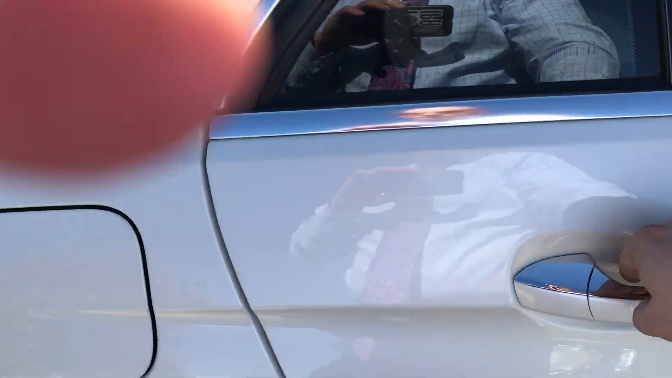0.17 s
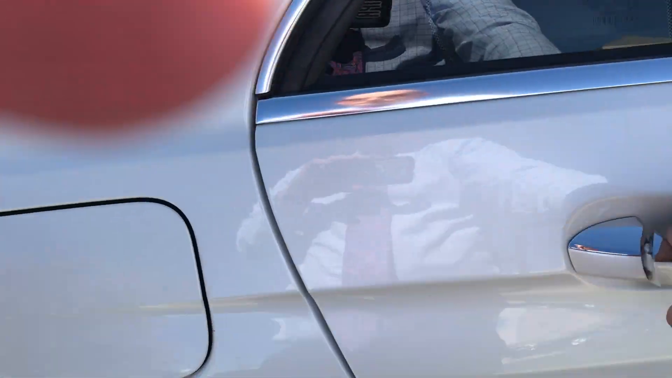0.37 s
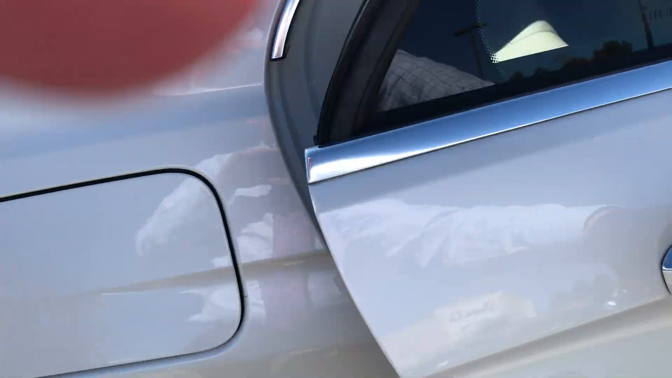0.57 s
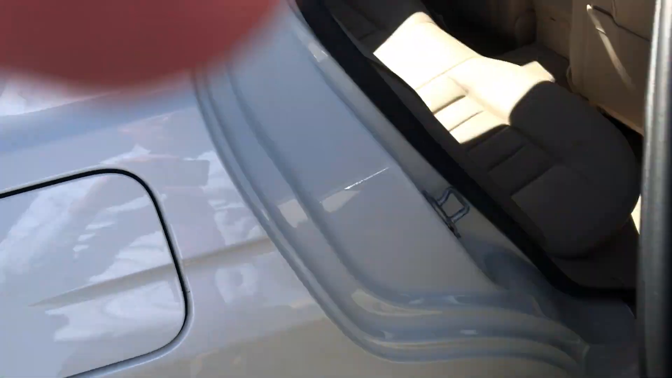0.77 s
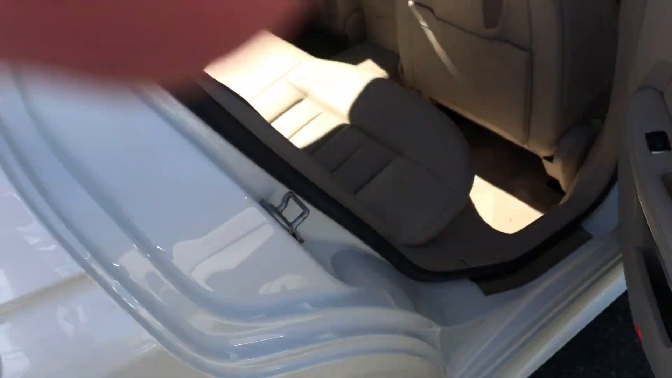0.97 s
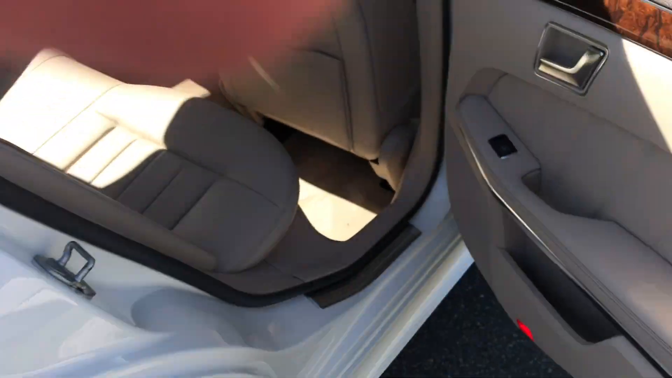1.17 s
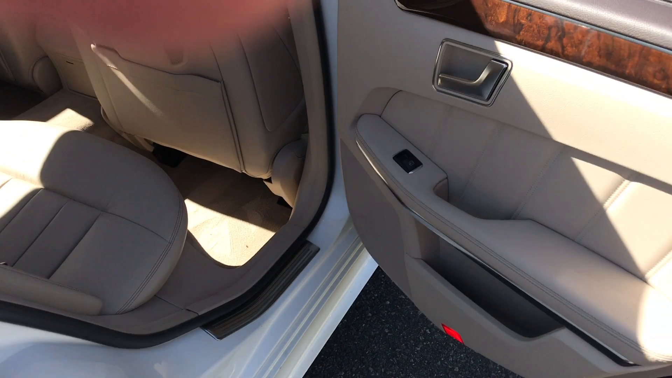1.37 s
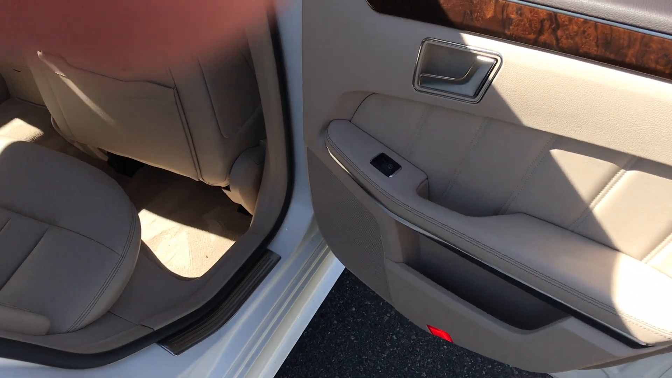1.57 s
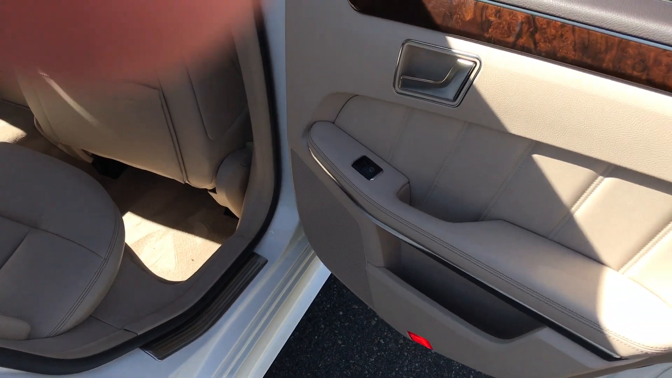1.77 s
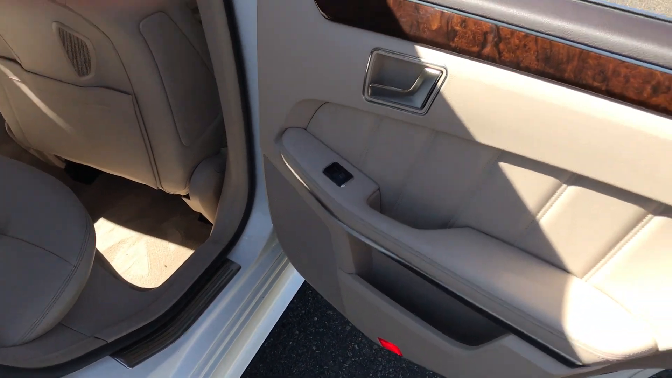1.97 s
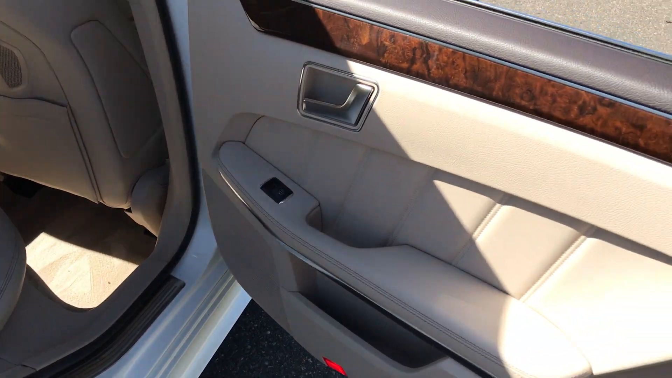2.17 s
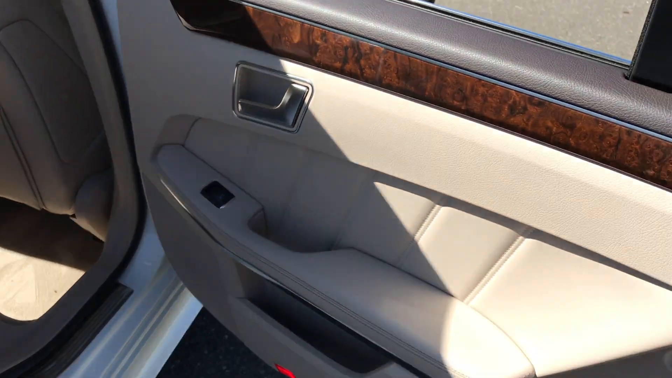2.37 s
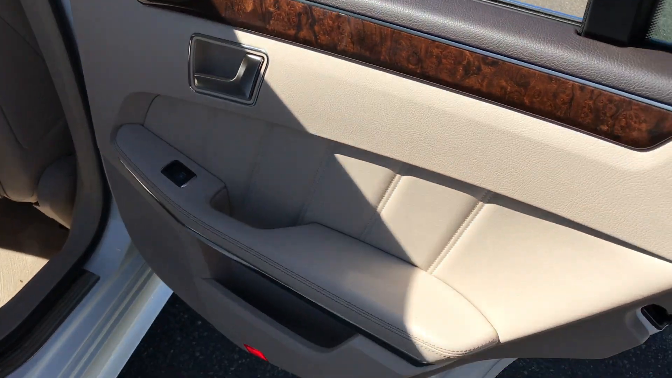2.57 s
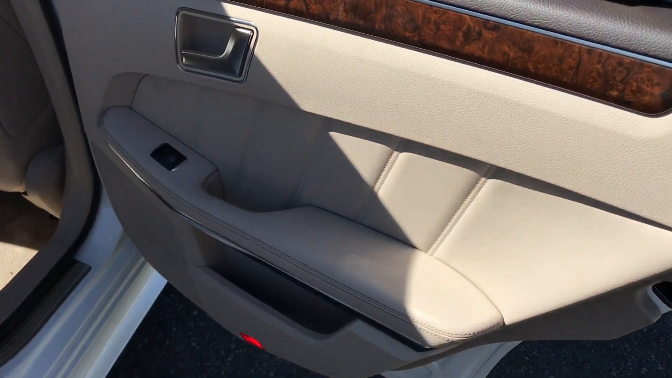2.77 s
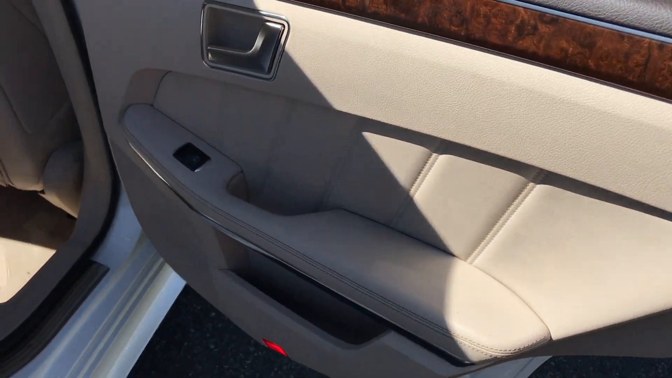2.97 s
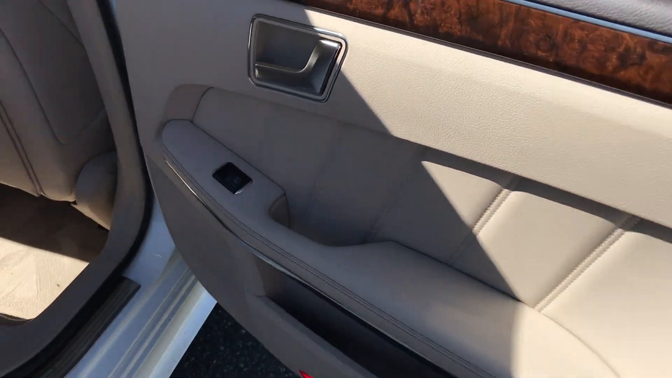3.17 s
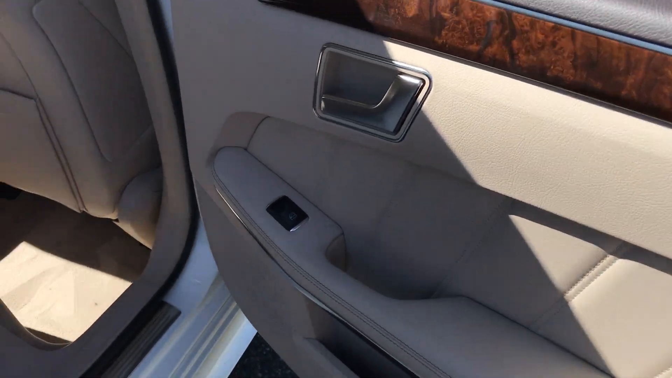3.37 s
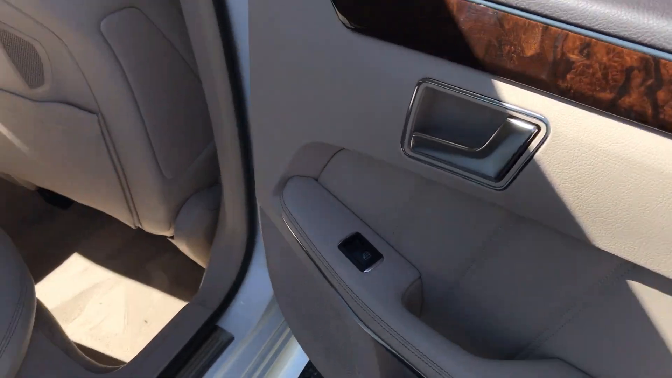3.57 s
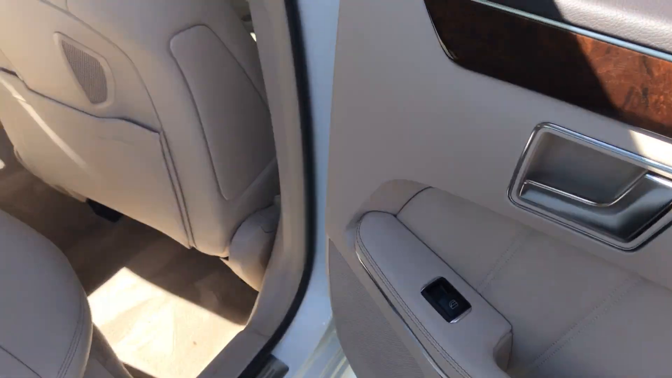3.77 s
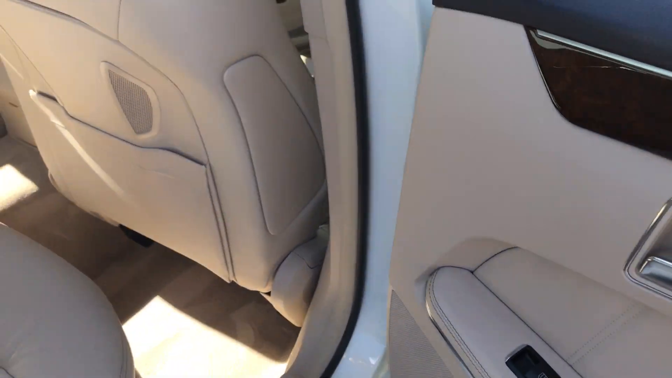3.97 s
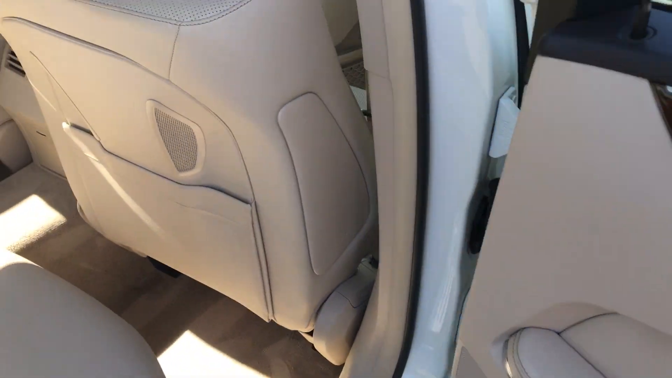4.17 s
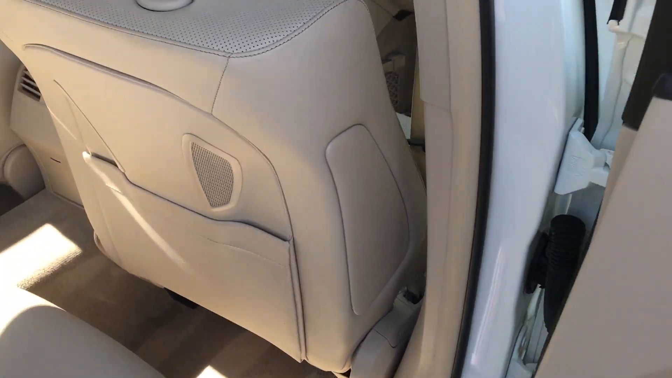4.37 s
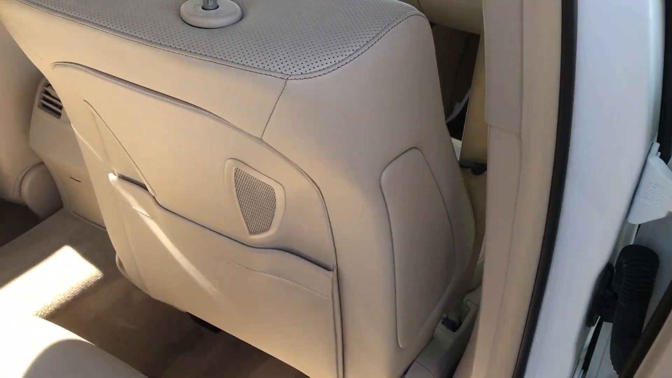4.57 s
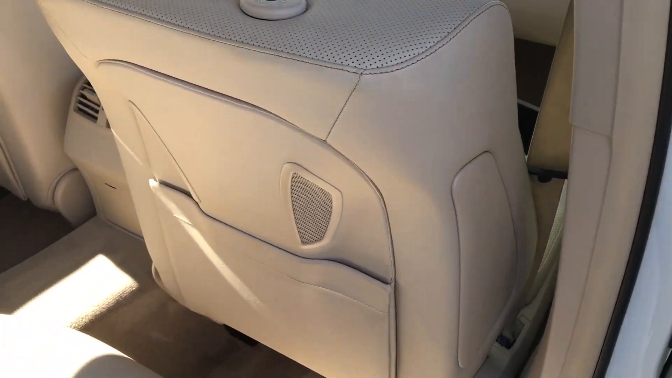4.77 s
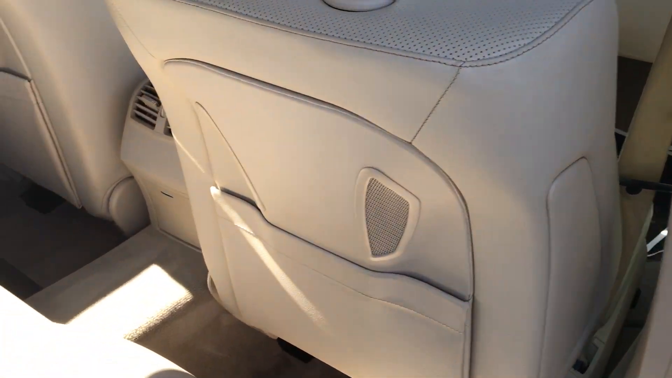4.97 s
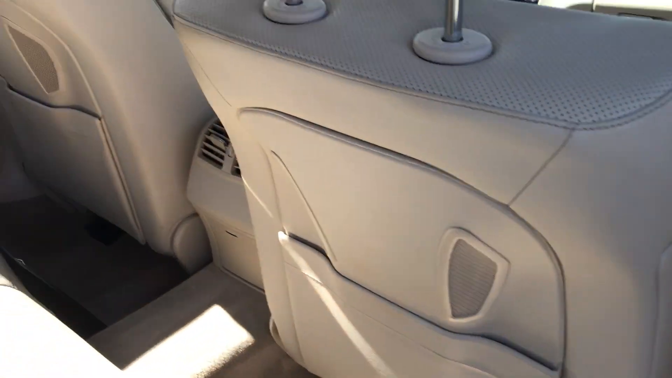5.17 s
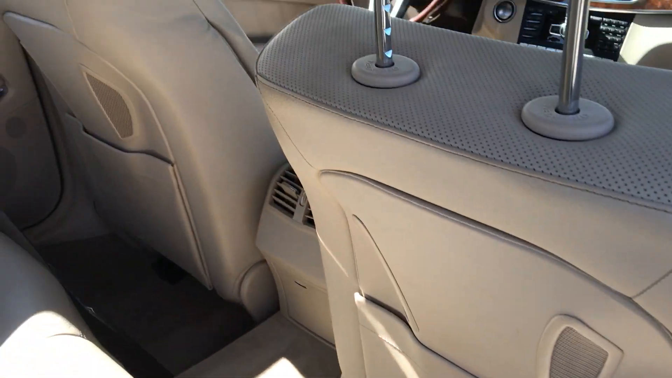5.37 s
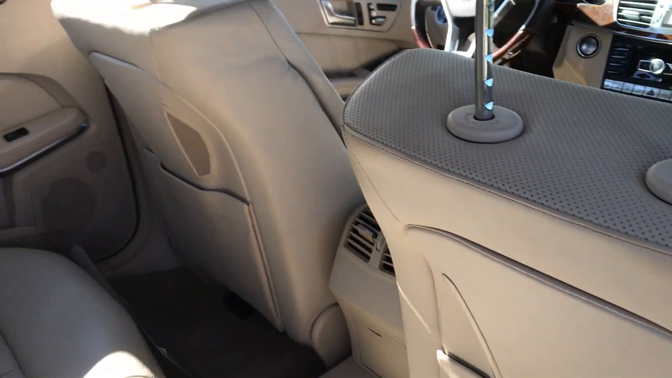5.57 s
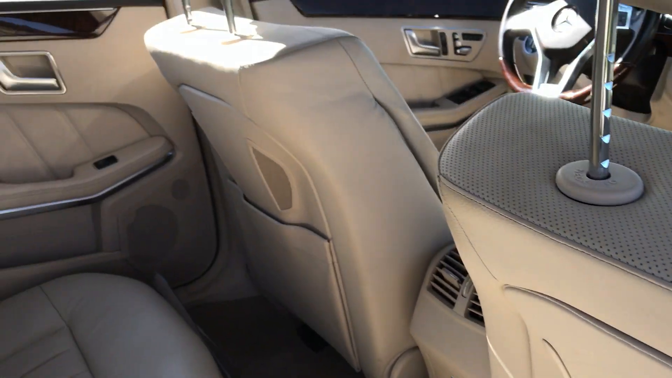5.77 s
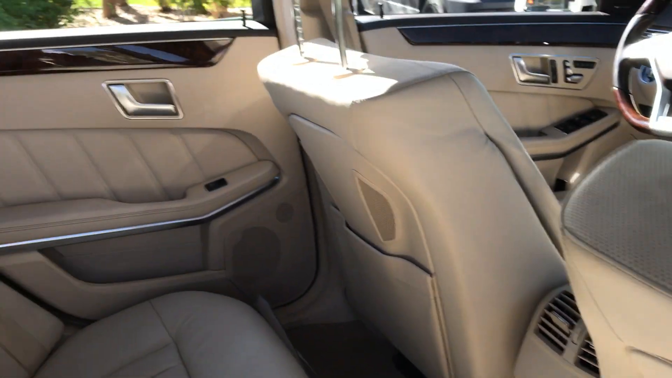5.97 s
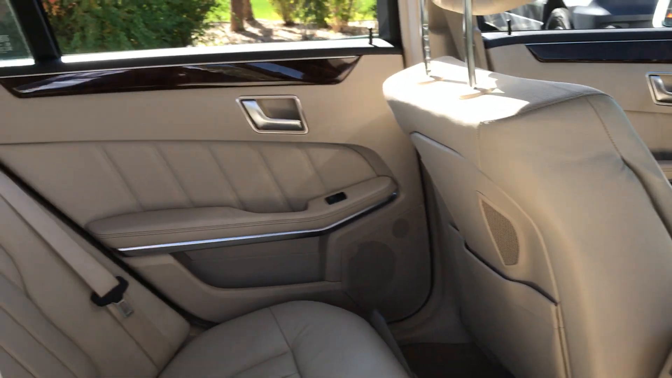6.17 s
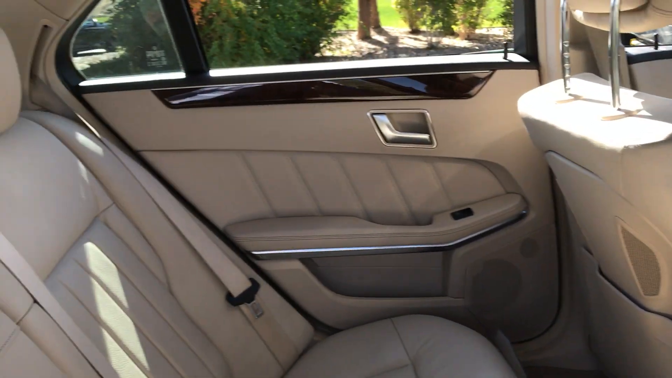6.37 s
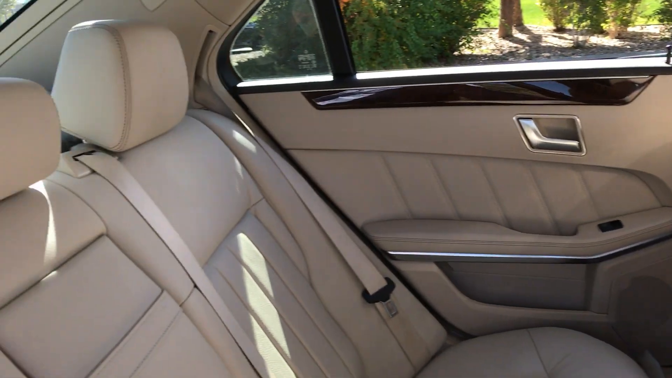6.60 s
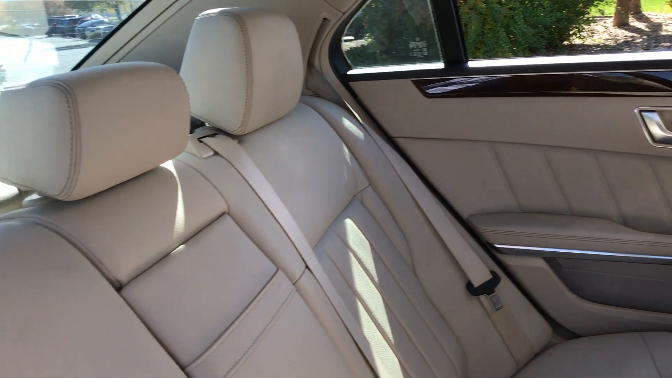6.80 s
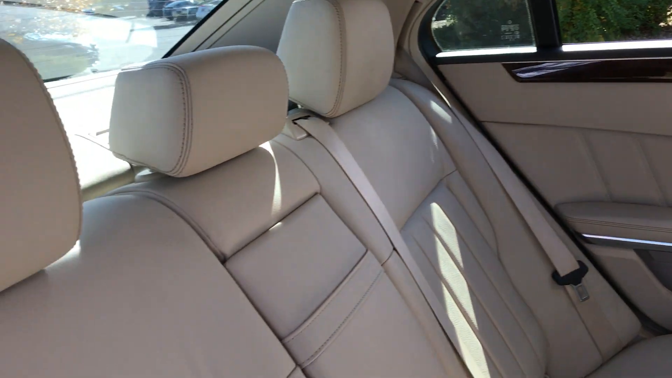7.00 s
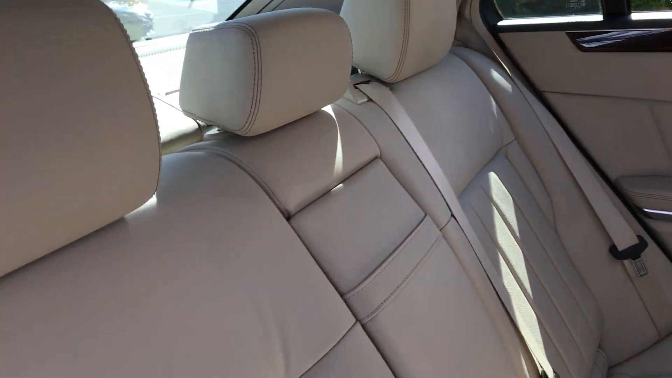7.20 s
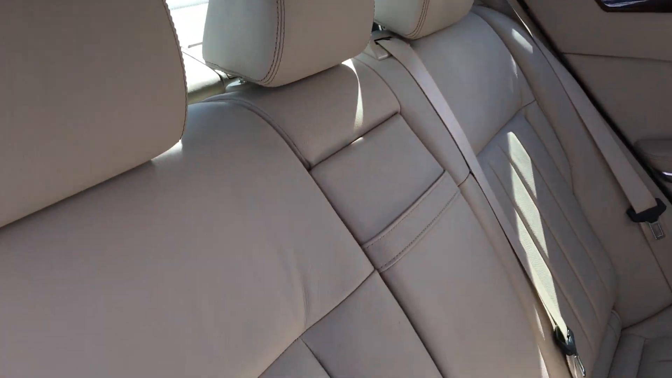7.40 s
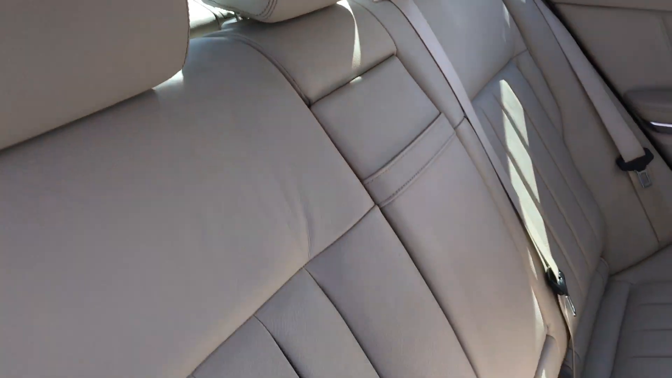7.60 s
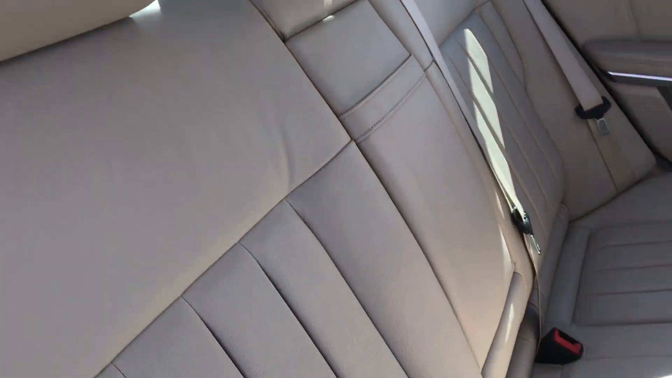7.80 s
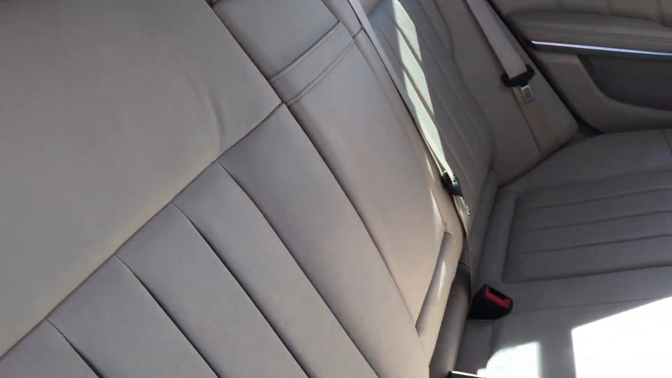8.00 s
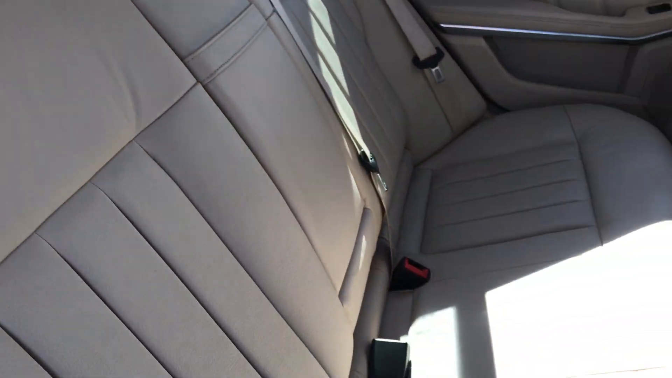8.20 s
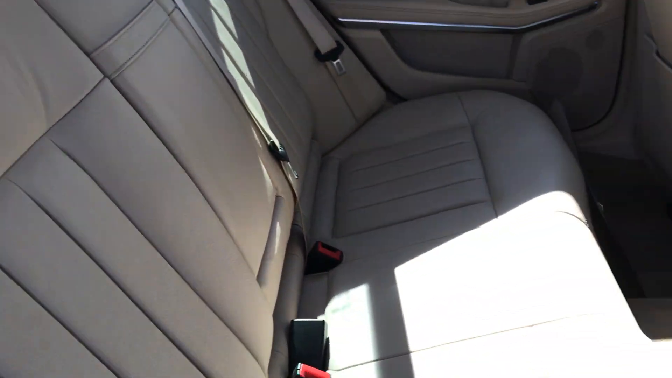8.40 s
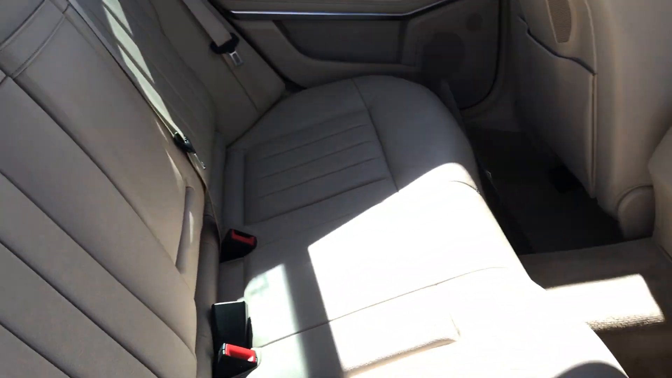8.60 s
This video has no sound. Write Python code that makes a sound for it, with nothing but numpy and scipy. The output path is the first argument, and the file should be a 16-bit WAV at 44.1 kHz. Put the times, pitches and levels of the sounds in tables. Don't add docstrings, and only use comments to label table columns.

```python
import sys
import numpy as np
from scipy import signal
from scipy.fft import rfft, irfft, next_fast_len
from scipy.io import wavfile
from scipy.ndimage import uniform_filter1d, map_coordinates

SR = 44100
rng = np.random.default_rng(int(sys.argv[2]) if len(sys.argv) > 2 else 0)


def to_linear_factor(level_db):
    exponent = np.asarray(level_db, float) / 20
    return 10 ** exponent


def pcm_store(signal):
    levels = np.round(np.clip(np.atleast_2d(signal), -1, 1) * 32767)
    wavfile.write(sys.argv[1], SR, levels.astype(np.int16).T)


N = 381244
TIME = np.arange(N) / SR


def unit(x):
    return x / np.sqrt(np.mean(x ** 2) + 1e-20)


def along(points, hz):
    f, db = np.transpose(points)
    return to_linear_factor(np.interp(np.log(hz + 1), np.log(f + 1), db, left=-120, right=-120))


def curves(rows):
    s, *cols = np.transpose(rows)
    return [np.interp(TIME, s, c) for c in cols]


def wobble(rate_hz):
    coarse = TIME[::8]
    knots = rng.standard_normal(int(N * rate_hz / SR) + 4)
    return np.interp(TIME, coarse, map_coordinates(knots, [coarse * rate_hz]))


def filtered(x, response):
    m = next_fast_len(len(x) + 8192)
    return irfft(rfft(x, m) * response(np.fft.rfftfreq(m, 1 / SR)), m)[:len(x)]


def resonances(peaks, turn=-1):
    def response(f):
        total = 0
        for k, (c, w, db) in enumerate(peaks):
            total = total + turn ** k * to_linear_factor(db) * 1j * f * w / (c * c - f * f + 1j * f * w)
        return total
    return response


def muffled(peaks, edge_hz, turn=-1):
    return lambda f: resonances(peaks, turn)(f) / (1 + 1j * f / edge_hz) ** 4


def rush(spectrum, patchy_db=0.):
    z = signal.stft(rng.standard_normal(N + 512), nperseg=512)[2]
    field = uniform_filter1d(rng.standard_normal(z.shape), size=6, axis=0)
    field = uniform_filter1d(field, size=12, axis=1)
    noise = signal.istft(z * to_linear_factor(patchy_db * unit(field)), nperseg=512)[1][:N]
    return unit(filtered(noise, lambda hz: along(spectrum, hz)))


def blows(times_s, sizes):
    return np.bincount(np.round(np.asarray(times_s) * SR).astype(int), sizes, N)[:N]


def dying(times_s, dbs, t60s, rise_s=0.0004):
    t = TIME[:SR // 4, None]
    shapes = to_linear_factor(dbs - 60 * t / np.abs(t60s)) * (1 - np.exp(-t / abs(rise_s)))
    where = np.round(np.asarray(times_s) * SR).astype(int) + np.arange(len(t))[:, None]
    return np.sqrt(np.bincount(where.ravel(), shapes.ravel() ** 2, N + SR)[:N])


def add_burst(track, s, envelope, hz, octaves):
    def bell(f):
        dip = 1 - 0.6 * np.exp(-((f - 10500) / 320) ** 2)
        return np.exp(-.5 * (np.log2((f + 1) / hz) / octaves) ** 2) * dip
    noise = unit(filtered(rng.standard_normal(len(envelope)), bell))
    track[round(s * SR):][:len(envelope)] += envelope * noise


# (time [s], shade [dB])
SHADE_DB = [(0, 3), (.14, -4), (.36, 1), (.84, 1.5), (1.03, -2), (1.44, 0.5), (1.7, -0.5), (2.96, 0),
            (4.11, -2.5), (4.5, -4), (5.32, -6.5), (6.23, -8.5), (6.9, -9), (7.58, -8), (7.9, -6.5),
            (8.64, -6)]


def body_shade():
    return curves(SHADE_DB)[0]


# (time [s], level [dB])
FLOW_DB = [(0, 0.5), (.14, 1.5), (.6, -2), (.96, 2.5), (1.2, -0.5), (3.25, 0), (4.5, -0.5), (6.57, -3),
           (7.03, -5.5), (7.5, -2.5), (8.64, -2.5)]
# (frequency [Hz], density [dB per Hz])
RUMBLE_SPECTRUM = [(14, -65), (27, -40), (38, -13), (65, -0.5), (91, -2.5), (118, -4), (146, -10),
                   (168, -16), (220, -20), (290, -56)]
ROAR_SPECTRUM = [(88, -52), (150, -11), (167, -12.5), (242, -6), (376, -14), (450, -24.5), (580, -70),
                 (990, -120)]
ROAD_SPECTRUM = [(260, -21), (450, -5), (579, -5), (747, -3.5), (798, -5.5), (870, -2), (1150, -6.5),
                 (1500, -34), (2530, -120)]
TYRE_SPECTRUM = [(680, -28), (1150, -4), (1330, -2), (1460, -2), (1660, -5), (2400, -12), (3120, -18.5),
                 (5280, -120)]


def street():
    shade_db, (flow_db,) = body_shade(), curves(FLOW_DB)
    swell = wobble(2.95)
    rumble = to_linear_factor(-37 + flow_db + 0.18 * wobble(11.0)) * rush(RUMBLE_SPECTRUM, patchy_db=0.2)
    roar = to_linear_factor(-51 + 0.5 * shade_db + 0.36 * swell) * rush(ROAR_SPECTRUM, patchy_db=0.34)
    road = to_linear_factor(-52.5 + 0.72 * shade_db + 1.1 * swell) * rush(ROAD_SPECTRUM, patchy_db=0.64)
    tyres = to_linear_factor(-57 + 0.79 * shade_db + 0.5 * swell) * rush(TYRE_SPECTRUM, patchy_db=2.0)
    return rumble + roar + road + tyres


def drone(hz, rows, unsteady_db, drift_rad):
    db, = curves(rows)
    gate = np.interp(TIME, [rows[0][0] - .2, rows[0][0]], [0, 1])
    phase = 2 * np.pi * np.cumsum(hz) / SR + drift_rad * wobble(4.8)
    return gate * np.sqrt(2) * to_linear_factor(db + unsteady_db * wobble(11)) * np.sin(phase)


# (time [s], firing rate [Hz])
FIRING_HZ = [(.2, 113), (.9, 101), (1.45, 108.5), (1.7, 112.9), (2, 117), (2.4, 120.5), (2.9, 130.4),
             (3.3, 136.2), (3.7, 139.5), (4.1, 145.6), (4.3, 144), (4.55, 134.2), (4.75, 129), (5.3, 132),
             (6.4, 139.7), (7.1, 141), (8.64, 151.5)]
# (time [s], level [dB])
EXHAUST_DB = [(.2, -47), (1.05, -40), (1.33, -47), (1.45, -34.5), (2.25, -32), (2.75, -37.5), (2.92, -33.5),
              (3.45, -43), (3.68, -34), (4.05, -43), (4.3, -34), (4.55, -45.5), (4.78, -34), (5.3, -37),
              (5.5, -46.5), (6.9, -51), (8.15, -44.5), (8.64, -47)]
# (time [s], level [dB])
AXLE_DB = [(2, -44), (2.4, -42), (2.8, -42.5), (4.3, -43.5), (5.3, -45.5), (6.2, -47), (6.8, -41),
           (7.3, -42), (8.64, -43.5)]


def truck():
    firing_hz, = curves(FIRING_HZ)
    unsteady_db = np.interp(TIME, [5.3, 5.8], [.7, 3.5])
    exhaust = drone(firing_hz, EXHAUST_DB, unsteady_db, drift_rad=0.25)
    axle = drone(.635 * firing_hz, AXLE_DB, unsteady_db=2.5, drift_rad=1.06)
    return exhaust + axle


# (order of the engine cycle, level [dB])
ORDERS = [(3, -47), (4, -39), (5, -48), (6, -64), (7, -52), (8, -54.5), (10, -57), (12, -64), (17.4, -69)]
# (frequency [Hz], width [Hz], level [dB])
VALVE_COVER = [(2880, 300, -4), (3700, 300, -2), (4240, 160, 2), (5200, 300, -6), (6300, 400, -11)]
# (frequency [Hz], width [Hz], level [dB])
PUMP_MODES = [(630, 55, -3.5), (2326, 29, -9), (2912, 99, -8.5), (3600, 110, -7.5)]
# (frequency [Hz], density [dB per Hz])
HISS_SPECTRUM = [(1060, -22), (1800, -8.5), (2410, -7), (2890, -2.5), (3340, 0), (3510, -4.5), (3930, -3),
                 (4370, -6), (4800, -8), (6390, -7.5), (8000, -20), (10400, -44), (17600, -120)]


def idle():
    cycle_hz, first_tick_s = 10, .038
    hiss_db = -58 + 1.14 * body_shade()
    lean_db = np.interp(TIME, [0, 4.2, 5.2], [-3, -3, 1.5])
    turns = np.cumsum(cycle_hz * (1 + 0.00444 * wobble(1.527))) / SR
    hum = np.zeros(N)
    for order, db in ORDERS:
        hum += to_linear_factor(db + 0.51 * wobble(2.47)) * np.sin(2 * np.pi * (order * turns + rng.random()))
    beat_s = np.arange(first_tick_s, N / SR, 1 / (4 * cycle_hz))
    size_db = np.where(np.arange(len(beat_s)) % 2, -11, 0) + 1.2 * rng.standard_normal(len(beat_s))
    ticks = unit(filtered(blows(beat_s, to_linear_factor(size_db)), lambda f: resonances(VALVE_COVER)(f) ** 2))
    pump = unit(filtered(rng.standard_normal(N), lambda f: resonances(PUMP_MODES)(f) ** 2))
    breath_db = 1.1 * np.cos(4 * np.pi * cycle_hz * (TIME - first_tick_s))
    bonnet = to_linear_factor(-13.0 - 0.7 * lean_db) * ticks
    bonnet += to_linear_factor(-4.5 - 0.44 * lean_db) * to_linear_factor(1.2 * wobble(3.42)) * pump
    bonnet += to_linear_factor(breath_db - 1.14) * rush(HISS_SPECTRUM, patchy_db=1.6)
    return to_linear_factor(lean_db) * hum + to_linear_factor(hiss_db) * bonnet


# (frequency [Hz], density [dB per Hz])
AIR_SPECTRUM = [(3820, -26), (6500, -6), (7820, -14), (8480, -5.5), (10500, -12), (12500, -7.5),
                (13800, -11), (15000, -8), (15700, -15)]


def open_air():
    return to_linear_factor(-71.5 + 0.88 * body_shade() + 0.34 * wobble(9.5)) * rush(AIR_SPECTRUM, patchy_db=1.2)


# (time [s], click [dB], latch [dB], click t60 [s])
CONTACT_EVENTS = [(0.018, -49, -33, .04), (0.0225, -36, -26, 0.067), (0.0311, -18.5, -30, 0.043),
                  (0.0312, -29, -20, 0.027), (.043, -39, -42, .05), (0.056, -28, -35, 0.047),
                  (.061, -45, -55, 0.19), (0.4988, -43, -40, .03), (0.499, -32, -29, 0.038),
                  (.5292, -43, -33, .012), (.534, -51, -51, 0.046), (.578, -57, -56, 0.036),
                  (0.954, -49, -49, 0.12), (.9668, -43, -45, .028), (0.974, -26, -27, 0.016),
                  (.98, -32.5, -37.5, 0.037), (.987, -50, -49, .036), (1.0027, -43, -51, 0.038)]
# (time [s], click [dB], latch [dB])
SPRING_EVENTS = [(0.0831, -31.5, -50), (0.129, -41, -62), (0.1774, -46, -59), (.354, -45, -52),
                 (.462, -39, -47), (0.67, -41, -50), (0.812, -39, -58), (0.881, -41, -61),
                 (0.9637, -33, -54), (1.1284, -56, -62)]
# (frequency [Hz], density [dB per Hz])
CLICK_SPECTRUM = [(2000, -7.5), (3200, -5.5), (4500, -10.5), (6500, -8.5), (8300, -11.5), (10500, -19.5),
                  (14400, -18), (16000, -27)]
# (frequency [Hz], width [Hz], level [dB])
LATCH_MODES = [(675, 140, -6), (870, 66, 1), (1094, 140, 0), (1400, 410, -1), (1710, 150, 3.5),
               (2110, 180, -1), (2490, 220, -0.5), (3180, 650, -2.5), (3700, 410, -9)]


def latch():
    spring_t60_s = 0.0091
    rows = [(*row, 1.6 * row[-1]) for row in CONTACT_EVENTS]
    rows += [(*row, spring_t60_s, 2.2 * spring_t60_s) for row in SPRING_EVENTS]
    s, click_db, latch_db, click_t60, latch_t60 = np.transpose(rows)
    crackle = unit(to_linear_factor(3.5 * wobble(1100)))
    click = dying(s, click_db + 0.5, click_t60) * crackle * rush(CLICK_SPECTRUM)
    impacts = unit(to_linear_factor(2.5 * wobble(900))) * rng.standard_normal(N)
    steel = muffled(LATCH_MODES, edge_hz=4500)
    rattle = dying(s, latch_db + 6.0, latch_t60 * 1.06, rise_s=0.00065) * impacts
    return click + filtered(rattle, steel) / np.std(filtered(impacts, steel))


# (time [s], level [dB], centre [Hz], t60 [s], width [octaves])
KNOCK_EVENTS = [(.019, -39, 3500, .05, .51), (.022, -29.5, 3880, .12, .39), (.408, -49, 1400, .12, .45),
                (.671, -52, 3000, .03, .7), (2.0096, -46, 5000, .018, .15), (2.0125, -54, 14500, .02, .06),
                (2.025, -54, 5300, .03, .2), (2.028, -54, 13000, .1, .06), (4.7555, -62, 14000, .07, .2),
                (4.76, -57, 2200, .18, .5), (4.857, -68, 10000, .1, .6), (7.8165, -48, 1900, .03, .55),
                (7.826, -52, 1300, .06, .78), (7.84, -54, 1200, .12, .37), (7.89, -56, 1300, .12, .3),
                (7.911, -62, 12500, .06, .1), (7.92, -55, 1300, .07, .5)]


def knocks():
    out, t = np.zeros(N + SR), TIME[:SR // 8]
    for s, db, hz, t60, octaves in KNOCK_EVENTS:
        add_burst(out, s, to_linear_factor(db - 60 * t / abs(t60)), hz, octaves)
    return out[:N]


# (time [s], dead thud [dB], ringing [dB])
PUSH_EVENTS = [(.024, -37, -28), (0.0314, -26, -17.5), (0.0345, -16, -13), (0.036, -9, -12.5),
               (0.044, -36, -24), (0.0466, -15, -36), (.051, -24, -40), (.064, -25, -25),
               (0.0668, -32, -32), (0.501, -23, -23), (0.506, -32, -25.5), (.511, -32, -23),
               (0.53, -39, -28), (0.538, -31, -38), (0.579, -30, -36), (0.593, -48, -44), (.672, -46, -39),
               (0.9759, -31, -14), (0.9856, -33, -26.5), (0.9936, -35, -27), (1.004, -35, -42),
               (1.011, -44, -42)]
# (frequency [Hz], width [Hz], level [dB])
PANEL_MODES = [(89, 66, 0), (165, 29, -22), (211, 35, 1.5), (283, 51, 7), (327.5, 24, 15.5), (408, 31, 8),
               (458, 68, 14.5), (550, 76, -3), (640, 43, -10)]
# (frequency [Hz], width [Hz], level [dB])
THUD_MODE = [(180, 310, 0.5)]


def door_skin():
    s, thud_db, ring_db = np.transpose(PUSH_EVENTS)
    thud = filtered(blows(s, -to_linear_factor(thud_db + 37.5)), muffled(THUD_MODE, edge_hz=590))
    ring = filtered(blows(s, -to_linear_factor(ring_db + 35.5)), muffled(PANEL_MODES, edge_hz=760, turn=0.88))
    return thud + ring


# (time [s], level [dB], frequency [Hz], t60 [s])
TAP_EVENTS = [(.0325, -9.5, 696, .03), (.034, -17.5, 1643, .04), (.0375, -16, 477, 0.03),
              (.0635, -22.5, 290, .16), (.5005, -33, 3870, .022), (.5015, -18, 1785, .035),
              (.5018, -15.5, 1407, 0.03), (.5125, -33, 2150, .03), (.5295, -30, 1250, .02),
              (.535, -43, 1497, 0.46), (.578, -39, 1480, .04), (.58, -44, 1900, .03),
              (.586, -41, 980, 0.026), (.588, -39, 413, .16), (.593, -42, 690, .041),
              (.6712, -45, 1890, .02), (.6716, -45, 1280, .025), (.672, -33.5, 640, .045),
              (.6724, -44, 850, .03), (.9545, -34, 1760, .03), (.966, -45, 3100, .02),
              (.976, -19.5, 323, .17), (.9764, -29, 468, .1), (.985, -41, 303, .1),
              (1.194, -24, 136.2, .03), (1.196, -34, 448, .03), (4.757, -41, 722.5, .03),
              (4.759, -38, 1400, 0.034), (4.76, -51, 1940, .03), (4.7605, -55, 2860, .03),
              (4.777, -45, 1365, .054), (4.798, -51, 1530, .074), (7.8168, -47, 3000, .02),
              (7.8172, -40, 1270, .023), (7.8176, -48, 1750, .02), (7.843, -46, 1200, .03),
              (7.853, -46, 1060, .03), (7.863, -45, 1450, .02), (7.892, -49, 1390, .06),
              (7.922, -48, 1360, .04), (7.931, -53, 2200, .05)]


def taps():
    out, t = np.zeros(N), TIME[:SR // 8]
    for s, db, hz, t60 in TAP_EVENTS:
        envelope = to_linear_factor(db - 60 * t / abs(t60)) * (1 - np.exp(-t / 0.00082))
        out[round(s * SR):][:len(t)] += envelope * np.sin(2 * np.pi * hz * t)
    return out


# (time [s], level [dB], t60 [s])
SHIVER_EVENTS = [(.036, -20, 0.32), (0.504, -27, 0.27), (.58, -27.5, 0.11), (.976, -29.5, 0.23)]
# (frequency [Hz], density [dB per Hz])
TRIM_SPECTRUM = [(100, -31), (170, -1), (326, -6.5), (817, -18), (915, -18), (1340, -26.5), (1460, -20),
                 (1970, -43), (3320, -47), (5000, -46), (6500, -65), (11000, -120)]


def trim():
    envelope = dying(*np.transpose(SHIVER_EVENTS), rise_s=0.0045)
    return envelope * to_linear_factor(1.5 * wobble(220)) * rush(TRIM_SPECTRUM)


# (time [s], frequency [Hz], level [dB], rise [s], hold [s])
BOOM_EVENTS = [
    (0.0392, 62.6, -14, 0.003, 0.072),
    (0.501, 87, -16, .003, 0.012),
    (0.973, 87, -25, 0.0056, 0.016),
]


def boom():
    out, t = np.zeros(N), TIME[:SR // 4]
    for s, hz, db, rise, hold in BOOM_EVENTS:
        envelope = to_linear_factor(db) * (1 - np.exp(-t / rise)) * np.exp(-(t / hold) ** 3)
        out[round(s * SR):][:len(t)] += envelope * np.sin(2 * np.pi * hz * t)
    return out


# (centre time [s], length [s], level [dB], centre [Hz], width [octaves])
SCUFF_EVENTS = [(.4, .03, -52, 1650, .12), (.418, .11, -61, 9000, 1.4), (.468, .043, -61.5, 8000, .92),
                (.948, .019, -54, 5000, .92), (.994, .025, -61, 7000, 1.2), (1.435, .08, -56, 2000, .5),
                (1.443, .059, -57, 10000, .6), (1.547, .6, -58, 1420, .23), (2.065, .13, -66, 12000, .6),
                (3.04, .06, -60, 4200, .3), (3.058, .06, -65, 11000, 1.2), (4.7, .12, -71, 9000, 1),
                (4.763, .02, -61, 13800, .16), (4.766, .03, -58, 8500, .25), (4.786, .04, -62, 7000, 1.1),
                (4.789, .025, -66, 14800, .08), (4.82, .06, -69, 10000, .8), (4.88, .1, -70, 11000, .6),
                (4.91, .025, -70, 10500, .5), (7.838, .14, -68, 2000, .7), (7.88, .65, -75, 11000, .8),
                (7.925, .08, -67, 3400, .3), (8.1, .3, -76, 11000, .7), (8.279, .2, -69, 4970, .85),
                (8.29, .09, -65, 3300, .35), (8.3, .6, -62, 1200, .25), (8.458, .085, -68, 5500, .85),
                (8.562, .05, -74, 9000, 1)]


def scuffs():
    out = np.zeros(N + SR)
    for s, length, db, hz, octaves in SCUFF_EVENTS:
        add_burst(out, s - length / 2, to_linear_factor(db) * np.hanning(round(length * SR)), hz, octaves)
    return out[:N]


# (start [s], end [s], start pitch [Hz], end pitch [Hz], level [dB])
TONE_LINES = [(1, 4.93, 640, 642, -63.5), (1.4, 4.596, 617, 613, -69), (1.2, 4.5, 2902, 2902, -80),
              (1.2, 5.2, 3596, 3596, -80), (2.4, 5.17, 174, 175, -54.5), (1.6, 2.9, 184, 207, -55.5),
              (2.6, 3.9, 110, 130, -45), (5.5, 8.9, 98, 107, -45), (6.4, 6.3, 300, 231, -56),
              (7.8, 8.5, 243, 228, -58.5)]


def tones():
    out, waver, bend = np.zeros(N), wobble(4), wobble(3)
    for k, (start, end, from_hz, to_hz, db) in enumerate(TONE_LINES):
        t = TIME[round(start * SR):round(end * SR)]
        own = (np.arange(len(t)) + k * SR) % N
        fade = np.clip(np.minimum(t - start, end - t) / 0.21, 0, 1)
        hz = np.interp(t, [start, end], [from_hz, to_hz])
        phase = 2 * np.pi * np.cumsum(hz) / SR + 1.3 * bend[own]
        line = fade * np.sqrt(2) * to_linear_factor(db + 1.3 * waver[own]) * np.sin(phase)
        out[round(start * SR):][:len(t)] += line
    return out


# (time [s], level [dB])
STRAP_EVENTS = [
    (1.197, -19),
    (1.2713, -28.5),
]


def check_strap():
    s, db = np.transpose(STRAP_EVENTS)
    return filtered(blows(s, -to_linear_factor(db + 40.5)), muffled(THUD_MODE, edge_hz=510))


# (time [s], level [dB])
TICK_EVENTS = [(2.0096, -41), (2.017, -44), (3.038, -48), (3.0554, -54), (3.6581, -49), (4.0208, -54),
               (6.2492, -54), (7.6166, -52), (7.9104, -62), (8.5415, -60), (8.5535, -58.5)]


def ticks():
    out, t = np.zeros(N + SR), TIME[:SR // 8]
    for s, db in TICK_EVENTS:
        add_burst(out, s, to_linear_factor(db - 7.5 - 60 * t / 0.031), hz=11000, octaves=0.99)
    return out[:N]


# (time [s], level [dB])
GRIT_EVENTS = [
    (8.5947, -25.5),
    (8.599, -32.5),
    (8.602, -29),
    (8.608, -32.5),
    (8.639, -52),
]
# (frequency [Hz], density [dB per Hz])
GRIT_SPECTRUM = [(600, -45), (800, -14), (1500, -19), (3500, -15), (4400, -4.5), (5000, -8), (5900, -1.5),
                 (7300, -8.5), (8400, -1.5), (10500, -14), (15000, -13), (16000, -31)]


def grit():
    envelope = dying(*np.transpose(GRIT_EVENTS), 0.051, rise_s=0.00015)
    return envelope * unit(to_linear_factor(1.4 * wobble(1500))) * rush(GRIT_SPECTRUM)


def scene():
    background = street() + truck() + idle() + open_air() + tones()
    door = latch() + door_skin() + taps() + trim() + boom() + check_strap()
    handling = knocks() + scuffs() + ticks() + grit()
    return (background + door + handling)[None]


def roll_off(x):
    return signal.sosfilt(signal.butter(12, 16540, fs=SR, output="sos"), x)


def record(dry):
    top_hz = 15860
    mix = filtered(dry[0], lambda hz: hz < top_hz)[None]
    return roll_off(mix)


dry = scene()
out = record(dry)
pcm_store(out)
```